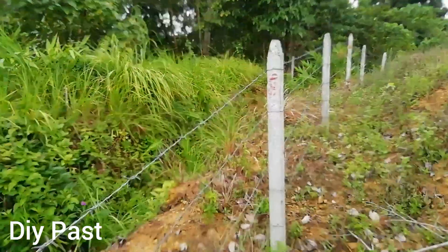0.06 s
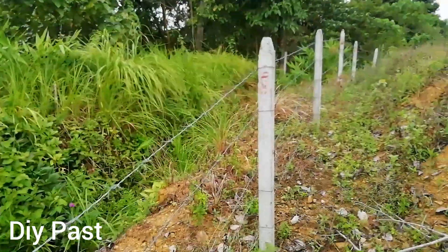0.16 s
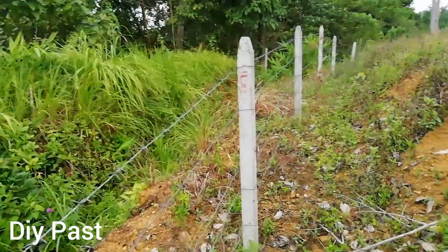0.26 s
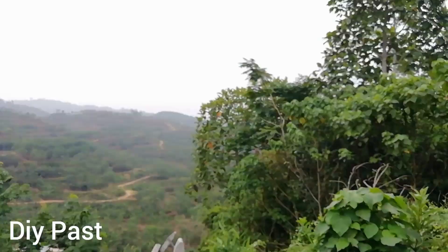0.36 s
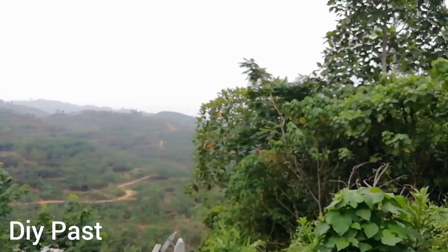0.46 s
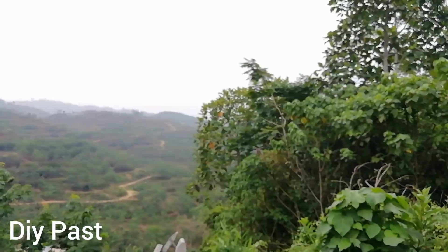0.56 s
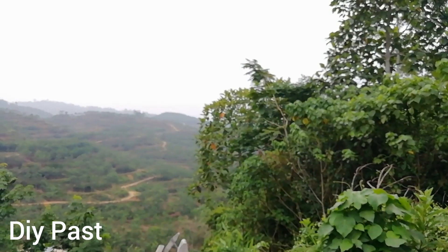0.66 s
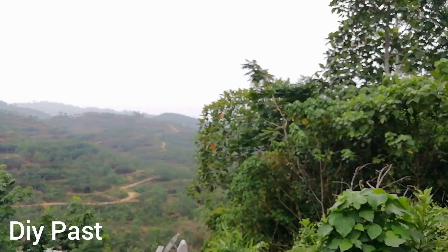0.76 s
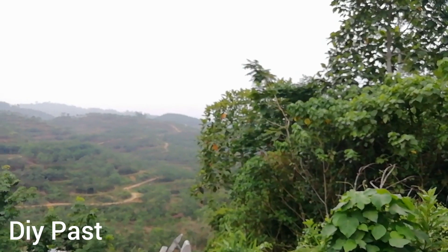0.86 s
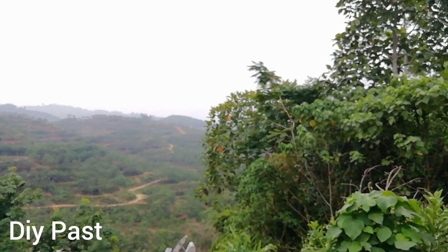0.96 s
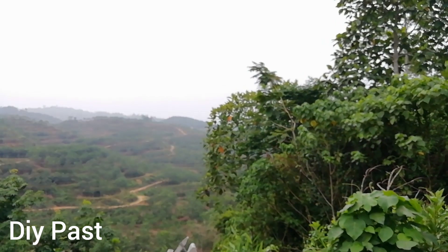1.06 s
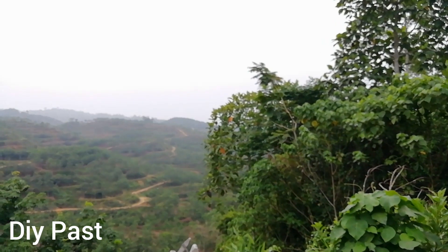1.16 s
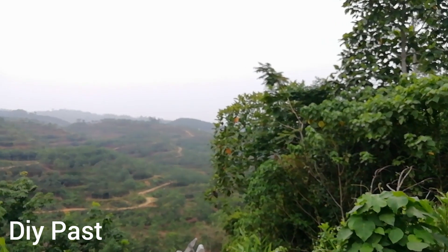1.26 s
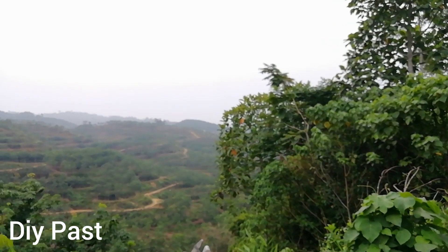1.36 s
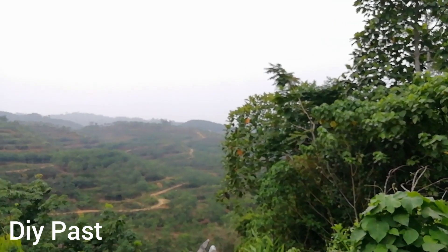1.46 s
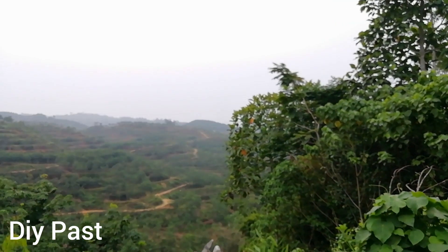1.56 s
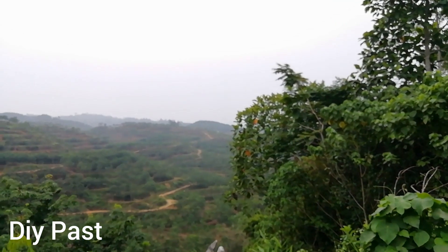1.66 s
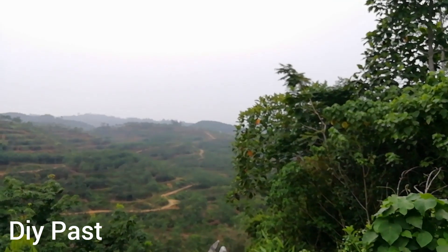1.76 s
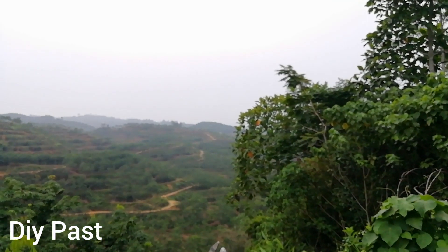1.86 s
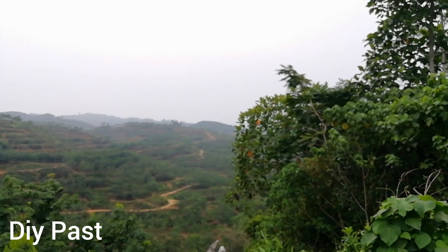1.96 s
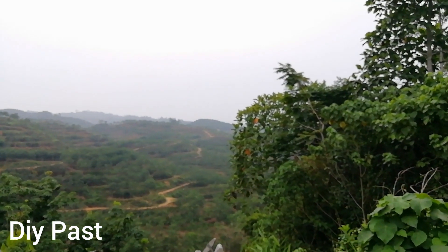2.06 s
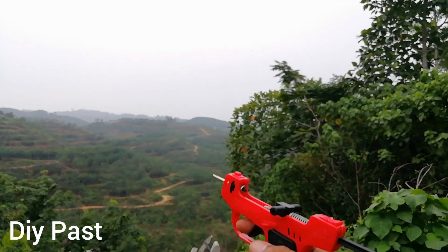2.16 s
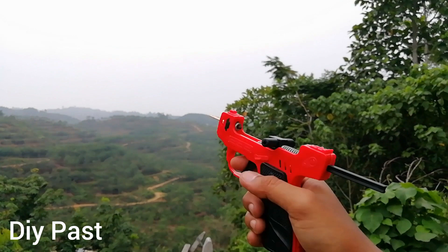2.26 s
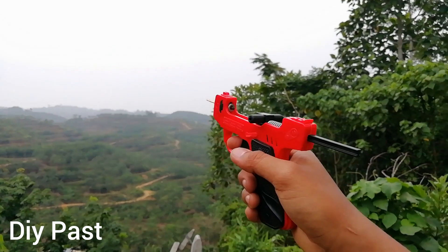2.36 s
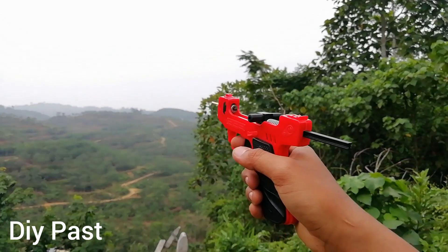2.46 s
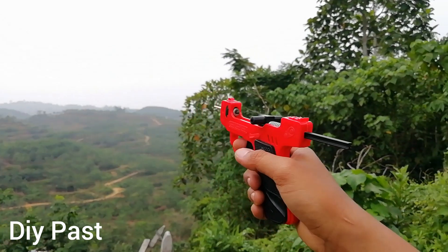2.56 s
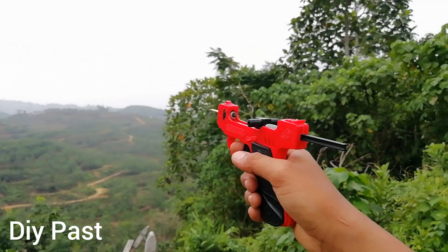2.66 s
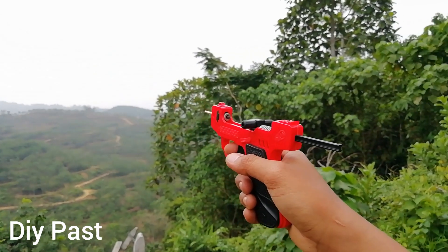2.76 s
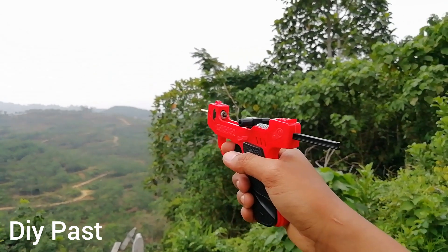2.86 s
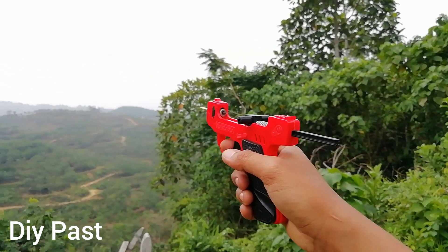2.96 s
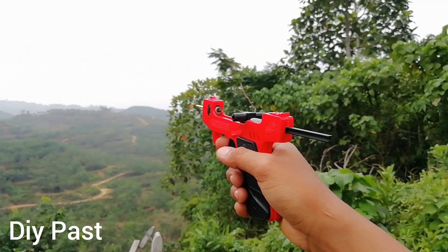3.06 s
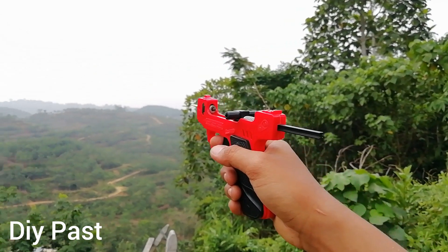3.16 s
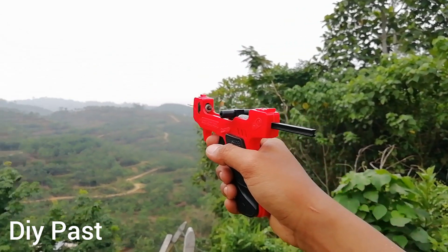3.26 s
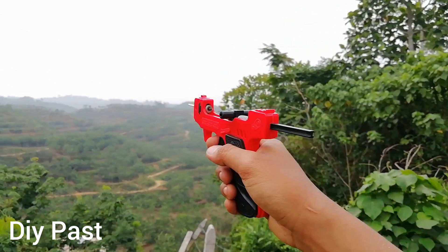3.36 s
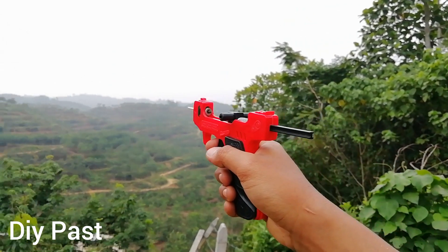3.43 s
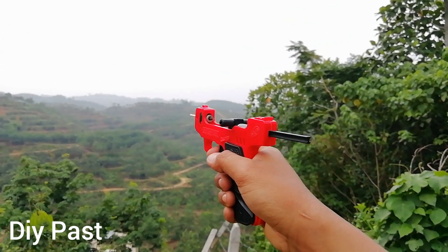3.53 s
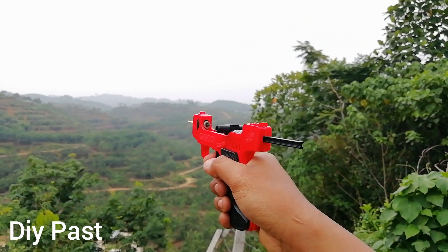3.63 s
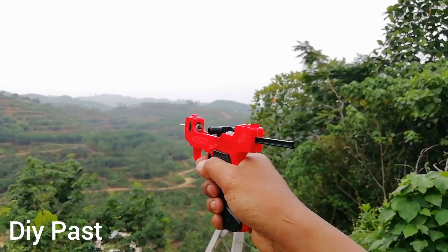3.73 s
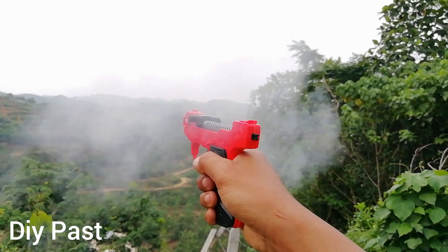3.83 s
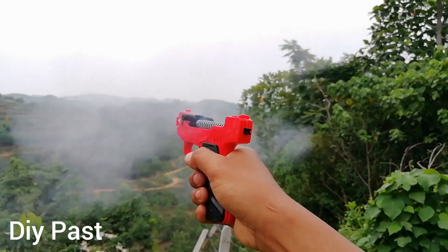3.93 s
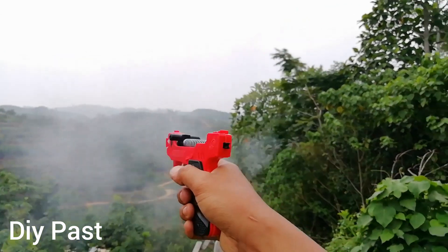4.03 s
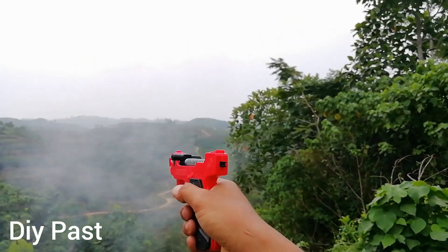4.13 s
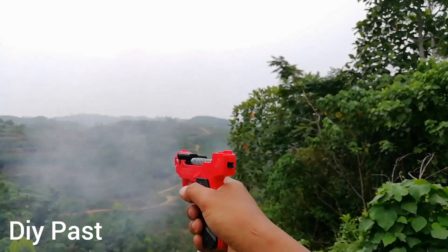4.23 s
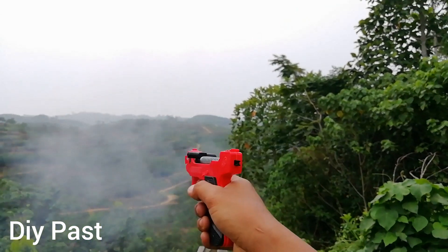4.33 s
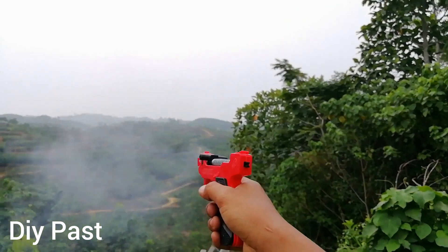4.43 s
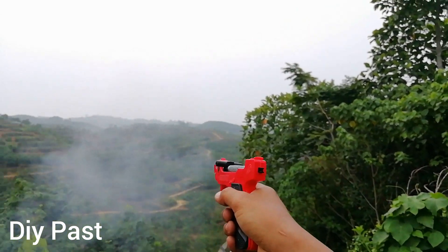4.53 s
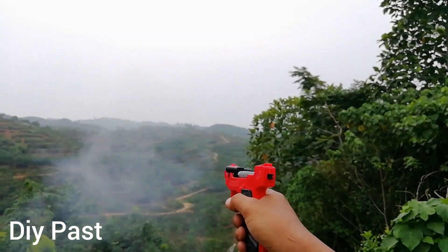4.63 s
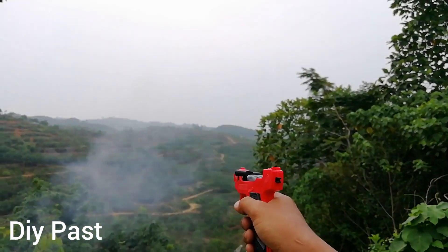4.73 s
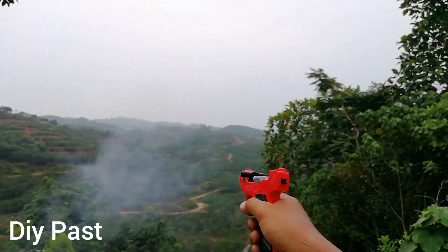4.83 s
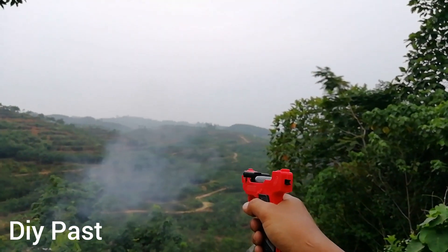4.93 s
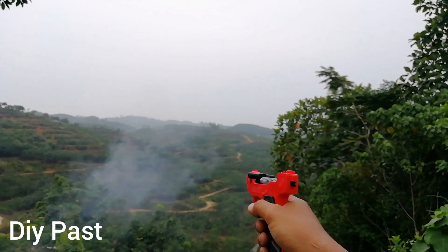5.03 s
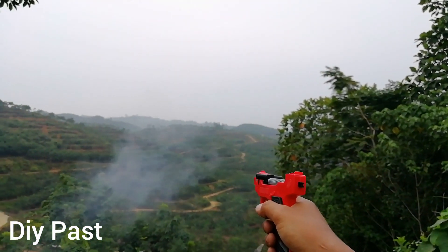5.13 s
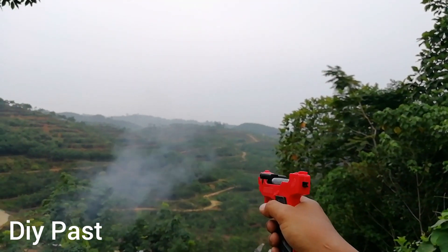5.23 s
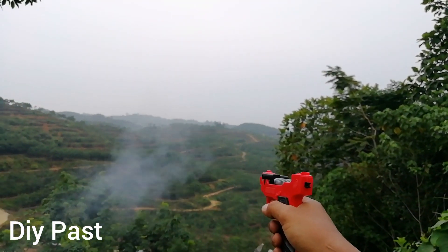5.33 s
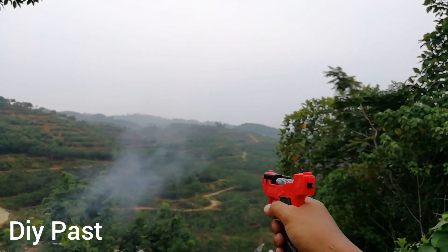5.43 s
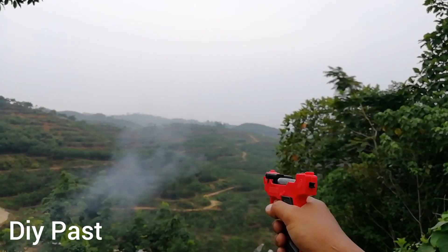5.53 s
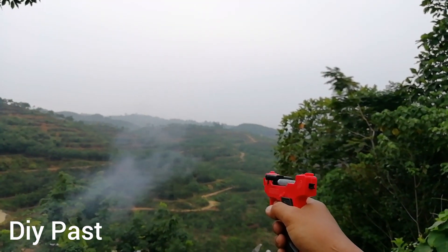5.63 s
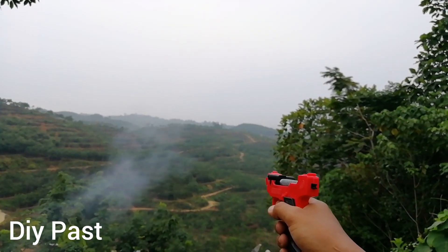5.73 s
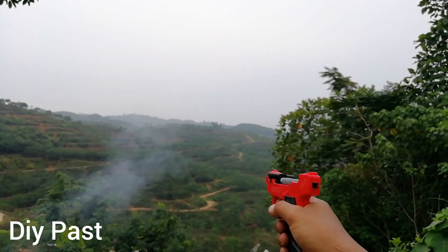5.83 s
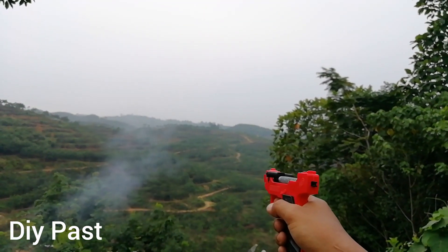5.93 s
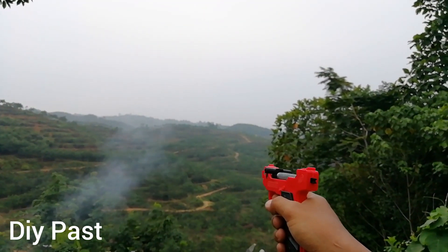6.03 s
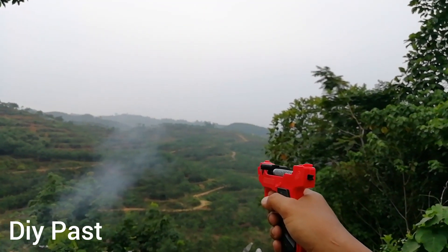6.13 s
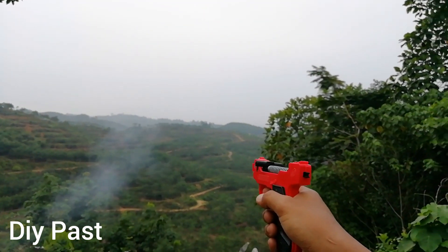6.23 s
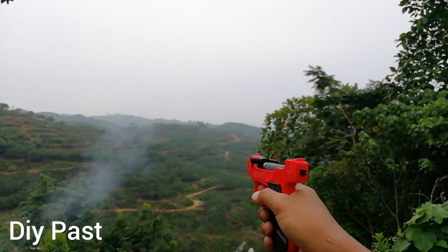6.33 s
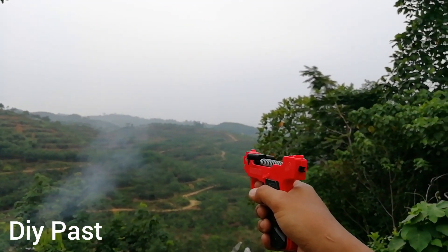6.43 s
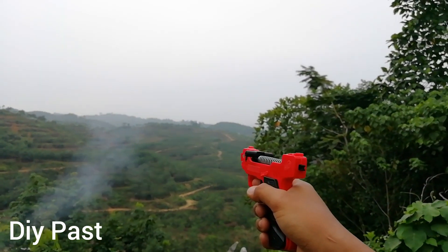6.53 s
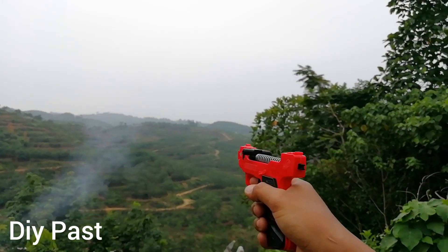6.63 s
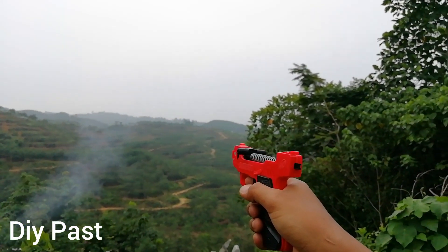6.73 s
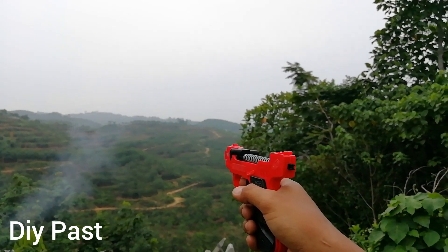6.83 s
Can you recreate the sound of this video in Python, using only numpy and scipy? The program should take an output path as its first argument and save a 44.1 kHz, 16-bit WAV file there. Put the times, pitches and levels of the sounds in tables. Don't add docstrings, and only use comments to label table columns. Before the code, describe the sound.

Crackly grass rustling stops abruptly and gives way to soft open air, thin insect buzzing, regular bird chips and a wavering far whistle. A single dry, ragged toy gun bang overloads the close stereo phone microphone. Foliage scatters it immediately, far slopes answer late with a faint hollow hum, and the tail drops away after about a second and a half. Faint chips, wind thumps and plastic ticks remain.

```python
import sys
import numpy as np
from scipy import signal
from scipy.fft import rfft, irfft, next_fast_len
from scipy.io import wavfile
from scipy.ndimage import uniform_filter1d

SR = 44100
rng = np.random.default_rng(int(sys.argv[2]) if len(sys.argv) > 2 else 0)


def elevation(decibels):
    levels = np.asarray(decibels, float)
    return 10 ** (levels / 20)


def digitize_waveform(pressure):
    field = np.atleast_2d(pressure).T
    bounded = np.clip(field, -1, 1)
    quanta = np.round(bounded * 32767).astype(np.int16)
    wavfile.write(sys.argv[1], SR, quanta)


N = 303849
CUT_S = 0.387
VALLEY_END_S, VALLEY_FADE_S = 5.53, 0.06


def read(points, hz):
    f, value = np.transpose(points)
    return np.interp(np.log(hz + 1), np.log(f + 1), value)


def evened(x):
    return x / np.sqrt(np.mean(x ** 2) + 1e-20)


def add(mix, start_s, sound):
    part = mix[..., round(start_s * SR):][..., :sound.shape[-1]]
    part += sound[..., :part.shape[-1]]


def coloured(points, shape):
    size = next_fast_len(shape[-1])
    z = rfft(rng.standard_normal(shape), size)
    gain = elevation(read(points, np.fft.rfftfreq(size, 1 / SR)))
    return evened(irfft(z * gain, size)[..., :shape[-1]])


def resonate(x, hz, width_hz):
    r = np.exp(-np.pi * width_hz / SR)
    return signal.lfilter([2 * (1 - r)], [1, -r * np.exp(2j * np.pi * hz / SR)], x).real


def resonate_twice(x, hz, width_hz):
    return resonate(resonate(x, hz, width_hz), hz, width_hz)


def wander(per_s, shape):
    size = int(SR / per_s)
    return evened(uniform_filter1d(uniform_filter1d(rng.standard_normal(shape), size), size))


def bell(t, middle_s, width_s):
    return np.exp(-((t - middle_s) / width_s) ** 2)


def struck(t, start_s, level_db, fall_db_per_s, rise_s):
    lag = np.maximum(t - start_s, 0)
    return (elevation(level_db - fall_db_per_s * lag) * (1 - np.exp(-lag / rise_s))) ** 2


def patchy(x, depth_db):
    z = signal.stft(x, nperseg=256, noverlap=192)[2]
    patches = uniform_filter1d(rng.standard_normal(z.shape), size=4, axis=1)
    patches = uniform_filter1d(patches, size=16, axis=2)
    z = z * elevation(depth_db * evened(patches))
    return evened(signal.istft(z, nperseg=256, noverlap=192)[1][:, :N])


def valley_open(t):
    return (1 - np.tanh((t - VALLEY_END_S) / VALLEY_FADE_S)) / 2


# start_s, level_db, fall_db_per_s
BRUSHES = [(0, -60, 900), (.005, -60.5, 58), (0.026, -53, 900), (0.0535, -40.5, 1100), (0.072, -47, 250),
           (.081, -56.5, 200), (0.0876, -38, 800), (0.11, -73, 195), (0.176, -45.5, 340), (.2, -59.5, 127),
           (.12, -59, 67), (.255, -69, 155)]
# pitch_hz, density_db_per_hz
RUSTLE_COLOUR = [(150, 0.5), (250, -3), (366, 1.5), (413, -12.5), (759, -15), (1300, -10), (1840, -11.5),
                 (2080, -13), (5300, -14), (14700, -31.5), (15800, -19)]
# start_s, level_db, fall_db_per_s
SEED_HEADS = [
    (.026, -52, 2000),
    (.0975, -44, 2200),
    (.11, -63, 30),
    (.178, -50, 150),
    (.195, -59.5, 45),
]
# pitch_hz, density_db_per_hz
SEED_COLOUR = [(5000, -25), (9000, 1), (13000, 0), (15800, -2)]
BRUSH_RISE_S, SEED_END_S = 0.0017, 0.296
STALK_HZ, STALK_WIDTH_HZ, STALK_DB = 3070, 720, -14.5


def grass():
    size = round(CUT_S * SR)
    t, out = np.arange(size) / SR, np.zeros((2, N))
    level = np.sqrt(sum(struck(t, *row, BRUSH_RISE_S) for row in BRUSHES))
    snaps = elevation(3.2 * np.minimum(rng.exponential(1, (2, size // 64 + 1)), 4))
    snaps = snaps.repeat(64, axis=1)[:, :size]
    stalks = evened(resonate_twice(rng.standard_normal((2, size)), STALK_HZ, STALK_WIDTH_HZ))
    rustle = coloured(RUSTLE_COLOUR, (2, size)) + elevation(STALK_DB) * stalks
    add(out, 0, level * elevation(8.0) * evened(uniform_filter1d(snaps, 40) * rustle))
    swish = np.sqrt(sum(struck(t, *row, 0.001) for row in SEED_HEADS))
    swish = swish * np.clip((SEED_END_S - t) / 0.01, 0.25, 1)
    add(out, 0, swish * coloured(SEED_COLOUR, (2, size)))
    return out


# pitch_hz, width_hz, level_db, throb_depth (0-1)
INSECTS = [
    (7810, 95, -62, 0.55),
    (7586, 170, -67.5, .5),
    (7687, 580, -64.5, 0.4),
    (6726, 600, -65.5, 0.1),
    (7183, 940, -70, 0),
    (4830, 190, -80, .2),
]
# pitch_hz, width_hz, level_db
SAW = (11220, 420, -76)
# start_s, end_s
BOUTS = [(0, .65), (.88, 1.35), (1.7, 2.1), (2.42, 2.93), (3.27, 3.7), (4.25, 4.6), (4.9, 5.15),
         (5.6, 5.85), (6.12, 6.45), (6.76, 8.1)]
STROKES_PER_S = 59.7
CHOIR_FENCE_DB, CHOIR_SAG_DB = -8.5, -1.5


def insects():
    t, out = np.arange(N) / SR, 0
    for hz, width_hz, db, depth in INSECTS:
        stroke = np.cos(2 * np.pi * STROKES_PER_S * t + 0.5 * wander(3, N))
        stroke = np.maximum(stroke, 0) ** 1.2
        band = resonate_twice(rng.standard_normal((2, N)), hz, width_hz)
        out = out + elevation(db + 1.2 * wander(6.3, N)) * evened(band * (1 - depth + depth * stroke))
    hz, width_hz, db = SAW
    bouts = sum(np.clip((t - start_s) / 0.15, 0, 1) * (t < end_s) for start_s, end_s in BOUTS)
    swell = 0.35 + uniform_filter1d(bouts, size=800)
    saw = evened(resonate_twice(rng.standard_normal((2, N)), hz, width_hz))
    choir_db = np.where(t < CUT_S, CHOIR_FENCE_DB, CHOIR_SAG_DB * t * SR / N)
    return elevation(choir_db) * out + elevation(db) * swell * saw


# pitch_hz, density_db_per_hz
AIR_COLOUR = [(200, -1), (350, -5.5), (520, -12), (800, -9.5), (1500, -8.5), (3000, -10), (3900, -9),
              (5000, -6), (6000, -16.5), (9200, -22.5), (10000, -13.5), (12500, -19.5), (14500, -18),
              (15800, -19)]
AIR_DB = -64.5
HUSH_DB, HUSH_BACK_S = -1.5, 0.98


def air():
    t = np.arange(N) / SR
    hush_db = HUSH_DB * (t > VALLEY_END_S) * np.exp(-abs(t - VALLEY_END_S) / HUSH_BACK_S)
    level = elevation(AIR_DB + hush_db + 0.5 * wander(9.8, N))
    return level * patchy(coloured(AIR_COLOUR, (2, N)), 1) * elevation(np.array([[0.8], [-0.8]]))


LATE_MS = 0.9
TURN_MS, TURN_S, TURN_WIDTH_S = -2.5, 2.6, 0.45
END_TURN_MS, END_TURN_S, END_TURN_WIDTH_S = -1.6, 7, 0.84


def sided(x):
    n = np.arange(N)
    turn_ms = TURN_MS * bell(n / SR, TURN_S, TURN_WIDTH_S)
    ms = LATE_MS + turn_ms + END_TURN_MS * bell(n / SR, END_TURN_S, END_TURN_WIDTH_S)
    return np.array([x, np.interp(n - ms * SR / 1000, n, x)])


# middle_s, peak_db, pitch_hz
THUDS = [(0.032, -37, 97), (0.091, -27.5, 88), (0.111, -27.5, 62.6), (0.14, -27.5, 73.6), (0.199, -41, 42),
         (0.235, -37, 93), (0.284, -39.5, 49.5), (0.338, -29.5, 82), (0.375, -38, 53), (1.431, -30.5, 83.5),
         (1.493, -31, 93), (1.512, -26.5, 96), (1.557, -44, 61), (2.71, -42.5, 46.5), (2.801, -44, 46),
         (2.884, -42.5, 50), (3.797, -43.5, 48.5), (4.134, -34.5, 51), (4.232, -40, 53.4), (4.272, -49, 54),
         (4.378, -44, 67.5), (5.232, -35.5, 125), (5.249, -26.5, 86.6), (5.294, -41.5, 68),
         (5.317, -38, 58.4), (5.402, -42.5, 68.6), (5.422, -40, 79), (6.294, -45.5, 64.6),
         (6.328, -48.5, 76.5), (6.86, -41, 63.7)]
# middle_s, half_width_s, level_db
GUSTS = [(0, 0.0069, -36.5), (.13, 0.12, -38.5), (1.4, 0.2, -66), (1.49, 0.046, -44), (2.0, 0.21, -61),
         (2.78, 0.31, -56.5), (3.75, 0.43, -66.5), (3.95, 0.085, -51), (4.2, 0.33, -59), (5.4, 0.21, -60.5),
         (5.9, 0.21, -64.5), (6.33, 0.21, -57), (6.871, 0.042, -51)]
# pitch_hz, density_db_per_hz
RUMBLE_COLOUR = [(13, -37.5), (22, 4), (53, -5.5), (93, -12.5), (167, -28), (231, -25), (289, -33),
                 (500, -31), (650, -61), (1100, -120)]
CALM_DB = -72


def thuds():
    out, t = np.zeros(N), np.arange(-1000, 1000) / SR
    for (s, db, hz), turn in zip(THUDS, rng.random(99)):
        swing = np.exp(-(t * hz / 0.5) ** 2) * np.cos(2 * np.pi * (hz * t + turn))
        steep = np.exp(-(t * hz / 0.46) ** 2) * np.cos(2 * np.pi * (2.52 * hz * t + turn))
        add(out, max(s - 1000 / SR, 0), elevation(db) * (swing + elevation(-15) * steep))
    t = np.arange(N) / SR
    level = elevation(CALM_DB) + sum(elevation(db) * bell(t, s, width_s) for s, width_s, db in GUSTS)
    rumble = coloured(RUMBLE_COLOUR, (3, N)) * level * elevation(2.7 * wander(21.0, N))
    return sided(out + rumble[0]) + 0.5 * rumble[1:]


# start_s, peak_db, ring_hz, snap_db, left_minus_right_db
TICKS = [(0.0258, -39, 3050, -3, -8), (.028, -46, 1490, -20, -8), (.054, -28, 3170, -8, -7),
         (.059, -40, 2050, -20, -3), (.1125, -47, 2120, -20, 2), (.153, -49, 1500, -22, -4),
         (0.089, -27, 1810, -29, -7), (.03, -40, 400, -25, -5), (.053, -34, 520, -25, -5),
         (.056, -33, 330, -25, -5), (.092, -28, 300, -25, -5), (.2, -34, 320, -25, -5),
         (.098, -25.5, 5540, -3.5, 19), (0.184, -30.5, 1440, -4, -1), (0.184, -33.5, 4400, -16, -13),
         (0.193, -38, 1280, -18, -9), (.204, -35, 1300, -12, 2), (.213, -41, 1150, -20, -6),
         (0.273, -47, 1280, -17, -9), (.262, -37.5, 1010, -9, -6), (.294, -51, 1180, -10, -8),
         (1.069, -56, 2300, 8, -7), (1.73, -51.5, 3830, 8.5, 3), (4.504, -34, 1490, -18, 1),
         (4.504, -40, 950, -18, 1), (4.503, -42, 1850, -18, 1), (5.027, -53, 3966, 14.5, -6),
         (6.362, -57, 2920, 3, 21), (6.383, -45, 784, -25, -10), (6.382, -52, 412, -15, -4),
         (6.384, -51, 1099, -24, -5), (6.361, -57, 1195, -22, 13), (6.395, -53, 750, -22, -11),
         (6.406, -52, 903, -22, -4), (6.754, -54, 950, -20, 0), (6.837, -53, 710, -20, 12),
         (6.851, -50, 2900, -10, 10), (6.755, -56.5, 1920, -10, 1), (6.837, -43, 2520, -20, 16),
         (6.837, -45, 3000, -20, 16), (6.836, -45, 221, -16, 3), (6.838, -51, 1400, -18, 2)]
RING_T60_S, RING_SLOPE = 0.02, 0.38


def ticks():
    t, out = np.arange(3000) / SR, np.zeros((2, N))
    for s, db, hz, snap_db, pan_db in TICKS:
        t60_s = RING_T60_S * (1000 / hz) ** RING_SLOPE
        noise = rng.standard_normal((2, 3000))
        ring = 0.86 * evened(resonate_twice(noise, hz, 0.32 * hz)) + np.sin(2 * np.pi * hz * t)
        ring = ring * elevation(-60 * t / max(t60_s, 0.004))
        snap = elevation(snap_db + 0.5) * noise[::-1] * elevation(-60 * t / 0.0077)
        level = elevation(db - 4.0 + pan_db * np.array([[0.5], [-0.5]]))
        add(out, s, level * (ring + snap) * (1 - np.exp(-t / 0.000088)))
    return out


WAVER = 0.01


def whistle(rows):
    s, hz, db = np.transpose(rows)
    t = np.arange(s[0], s[-1], 1 / SR)
    pitch_hz = uniform_filter1d(np.interp(t, s, hz), size=len(t) // 12 + 1, mode="nearest")
    pitch_hz = pitch_hz * (1 + WAVER * wander(60, (len(t),)))
    tone = np.sin(2 * np.pi * np.cumsum(pitch_hz) / SR)
    return s[0], elevation(np.interp(t, s, db) + 9.0) * tone * signal.windows.tukey(len(t), 0.12)


def trees(x, fall_s):
    t = np.arange(SR // 2) / SR
    fall = np.exp(-(t / fall_s) ** 2) + 0.14 * np.exp(-(t / (2.2 * fall_s)) ** 2)
    taps = rng.standard_normal((2, len(t))) * (1 - np.exp(-t / 0.015)) * fall
    return signal.fftconvolve(x[None], taps / np.linalg.norm(taps[0]), axes=1)[:, :N]


# time_s, pitch_hz, effort_db
SONG = [
    [(2.385, 3110, -75), (2.42, 3215, -69.5), (2.48, 3420, -64.5), (2.51, 3374, -68), (2.545, 3360, -75),
     (2.57, 3360, -75), (2.595, 3373, -65), (2.612, 3300, -78)],
    [(2.62, 3170, -63), (2.66, 3112, -62.5), (2.72, 3120, -56), (2.76, 3230, -61.5), (2.8, 3394, -57),
     (2.86, 3385, -63), (2.9, 3330, -71)],
    [(2.9, 3330, -71), (2.94, 3110, -62), (2.98, 2846, -56.5), (3.03, 2616, -56.5), (3.07, 2483, -64),
     (3.11, 2320, -67), (3.145, 2110, -77.5), (3.165, 2080, -76)],
    [(3.23, 4290, -59), (3.258, 4180, -65), (3.275, 3790, -63), (3.3, 3656, -64.5), (3.35, 3476, -69),
     (3.4, 3470, -63), (3.45, 3460, -84.5), (3.52, 3490, -86.5), (3.58, 3500, -85.5)],
    [(3.532, 2580, -73.5), (3.58, 2543, -68), (3.615, 2510, -67.5), (3.64, 2800, -67), (3.665, 3050, -62),
     (3.7, 3180, -68.5), (3.74, 3290, -71.5), (3.775, 3270, -65.5), (3.79, 3230, -79.5)],
]
# start_s, level_db
CHIPS = [(0.403, -64.5), (0.875, -63), (1.352, -62), (1.804, -61.5), (2.293, -61.5), (2.766, -60),
         (3.231, -61), (3.692, -63.5), (6.33, -71), (6.797, -65.5)]
# time_s, pitch_hz, effort_db
CHIP = [
    (0, 3550, -10),
    (.008, 3430, -1),
    (.03, 2560, -6),
    (.041, 2540, -28),
    (.05, 2680, -3),
    (.062, 2760, -9),
]
# start_s, start_hz, end_hz, length_s, level_db
PEEPS = [(1.42, 4500, 4180, .025, -68.5), (1.509, 3810, 3900, 0.024, -70), (1.535, 3950, 4550, .03, -77),
         (0.652, 3650, 3900, 0.033, -77), (.49, 3200, 2900, 0.023, -76), (2.107, 4880, 4900, .04, -74),
         (2.133, 3040, 2960, 0.083, -75), (2.57, 3900, 5000, 0.04, -76), (2.918, 4020, 4130, 0.023, -81),
         (2.95, 4050, 4630, 0.03, -71), (3.045, 4000, 4630, 0.025, -76), (5.385, 3420, 3480, 0.025, -68.5),
         (6.501, 3850, 3890, 0.029, -75.5)]


def birds():
    song, chips = np.zeros(N), np.zeros(N)
    for rows in SONG:
        add(song, *whistle(rows))
    for s, db in CHIPS:
        scale = (1, rng.uniform(0.99, 1.02), 1)
        add(chips, *whistle(np.array(CHIP) * scale + (s, 0, db)))
    for s, hz, end_hz, length_s, db in PEEPS:
        add(chips, *whistle([(s, hz, db), (s + length_s, end_hz, db)]))
    song *= elevation(2.5 * wander(60, N))
    whistler = elevation(-5) * song + elevation(0.5) * trees(song, 0.066)
    whistler = whistler * elevation(np.array([[-2.5], [2.5]]))
    return whistler + chips * elevation(np.array([[-4], [-7]])) + elevation(-7) * trees(chips, 0.03)


# start_s, peak_db, ring_hz, t60_s
STRIKES = [
    (3.8358, -25, 14700, .004),
    (3.836, -30, 6000, .004),
    (3.839, -3, 13000, .0012),
    (3.839, -5, 15500, .0012),
    (3.839, -6, 10000, .0012),
    (3.839, -12, 6500, .0012),
]
# start_s, left_db, right_db, burn_s, push_share
FLARES = [
    (3.8354, -40, -39.5, 0.0026, 0.00086),
    (3.8390, -13.5, -20.5, 0.0083, 0.065),
    (3.8427, -2.5, -3, 0.005, 1),
    (3.847, -17.5, -5, 0.0039, -0.51),
    (3.8501, 0, -6.5, 0.0083, 0.8),
    (3.857, -14, -11.5, 0.006, 0.059),
    (3.8611, -8.5, -9, 0.004, -0.2),
    (3.8637, -9.5, -7.5, 0.0081, .4),
    (3.8714, -13.5, -14.5, 0.0038, 0.2),
]
# pitch_hz, density_db_per_hz
FLARE_COLOUR = [(180, -34), (300, -5), (759, -16.5), (1400, -1.5), (2390, -10), (4060, -10.5), (4550, -13),
                (5470, -10.5), (9140, -18.5), (14500, -14), (15800, -19.5)]
# pitch_hz, level_db, t60_s
PUSH = [
    (93, -7, 0.043),
    (184, -14.5, 0.058),
    (417, -18, 0.063),
]


def bang():
    t, out, kicks = np.arange(1500) / SR, np.zeros((2, N)), np.zeros(N)
    for s, db, hz, t60_s in STRIKES:
        crack = elevation(db - 60 * t / t60_s) * np.sin(2 * np.pi * hz * t)
        add(out, s, crack * elevation(np.array([[-1.5], [-30]])))
    for s, left_db, right_db, burn_s, push in FLARES:
        shape = (1 - np.exp(-t / 0.00066)) * np.exp(-(t / burn_s) ** 3)
        level = elevation(np.array([[left_db], [right_db]]))
        add(out, s, level * shape * coloured(FLARE_COLOUR, (2, 1500)))
        kicks[round(s * SR)] += push
    t = np.arange(5000) / SR
    swing = sum(elevation(db - 60 * t / t60_s) * np.sin(2 * np.pi * hz * t) for hz, db, t60_s in PUSH)
    low = signal.oaconvolve(kicks, swing)[:N]
    low = signal.lfilter(*signal.butter(2, 60, "high", fs=SR), low)
    return out + np.array([np.roll(low, 42), low])


BANG_S = 3.866
# pitch_hz, density_db_per_hz
NEAR_COLOUR = [(100, -46), (200, -31), (500, -31), (800, -7), (1700, -2.5), (2400, -4.5), (5000, -7),
               (8000, -12), (11000, -13.5), (15800, -13.5)]
ABSORB_DB_PER_S = 24.5


def thicket():
    out = coloured(NEAR_COLOUR, (2, N))
    first = slice(round(BANG_S * SR), round(BANG_S * SR) + SR)
    hz, lag_s, z = signal.stft(out[:, first], SR, nperseg=256)
    loss_db = ABSORB_DB_PER_S * (hz[:, None] / 10000) ** 2 * lag_s
    out[:, first] = signal.istft(z * elevation(-loss_db), SR, nperseg=256)[1][:, :SR]
    return out


# pitch_hz, density_db_per_hz
FAR_COLOUR = [(100, -33.5), (250, -10.5), (470, -6.5), (1150, -5.5), (1380, -4.5), (1480, -3.5),
              (1590, -3.5), (2100, -9), (2900, -10), (4000, -16.5), (6000, -19.5), (9000, -41)]
# start_s, level_db, fall_db_per_s, low_body_db
SLOPES = [
    (3.9, -41, 24, -3),
    (4.5, -52, 21.5, -10),
    (4.99, -59, 10, -3),
]
# middle_s, half_width_s, level_db
LUMPS = [(3.9, 0.011, -0.5), (3.936, 0.0091, 2), (3.965, .012, -1), (3.997, .005, 0.5), (4.015, .01, 0.5),
         (4.033, .007, 2), (4.058, .005, 0), (4.09, .012, 1.5), (4.14, .012, -1), (4.17, .012, 1),
         (4.275, 0.022, 1), (4.9, 0.058, 1)]
NEAREST_DB, NEAREST_T60_S = -17.5, 0.12
BUSHES_DB, BUSHES_TOP_S, BUSHES_FALL_DB_PER_S2 = -22, 0.053, 269
DULLING_S, BRIGHT_SHARE, SCATTER_DB = 0.52, 0.97, 4
BODY_HZ = 1100
SLOPE_RISE_S, LINGER_DB = 0.014, -74.5


def scatter():
    t = np.arange(N) / SR
    lag_s = np.maximum(t - BANG_S, 0)
    nearest = struck(t, BANG_S, NEAREST_DB, 60 / NEAREST_T60_S, 0.001)
    bushes = nearest + elevation(BUSHES_DB - BUSHES_FALL_DB_PER_S2 * (lag_s - BUSHES_TOP_S) ** 2) ** 2
    answers = [struck(t, s, db, fall, SLOPE_RISE_S) + 1e-20 for s, db, fall, _ in SLOPES]
    body_db = sum(row[3] * power for row, power in zip(SLOPES, answers)) / sum(answers)
    valley = sum(answers) * valley_open(t)
    lumps_db = sum(db * bell(t, s, width_s) for s, width_s, db in LUMPS)
    level = np.sqrt(bushes + valley + elevation(LINGER_DB) ** 2) * (t > BANG_S) * elevation(lumps_db)
    far = np.clip(1 - BRIGHT_SHARE * bell(lag_s, 0, DULLING_S), 0, 1)
    lean = elevation(np.array([[1.5], [-0.5]]))
    dull = coloured(FAR_COLOUR, (2, N))
    low = signal.filtfilt(*signal.butter(2, BODY_HZ, fs=SR), dull)
    dull = dull - (1 - elevation(body_db)) * low
    mix = np.sqrt(1 - far) * thicket() + lean * np.sqrt(far) * dull
    return level * elevation(SCATTER_DB) * patchy(mix, 2.4)


# start_s, level_db, fall_db_per_s
GULLY = [
    (4.47, -65.5, 10),
    (5.03, -64.5, 3),
    (5.55, -78, 10),
]
GULLY_HZ, GULLY_WIDTH_HZ = 1470, 170
# start_s, level_db, fall_db_per_s
CANOPY = (4.0, -44.5, 59)
# pitch_hz, density_db_per_hz
CANOPY_COLOUR = [(3000, -22), (6000, -1), (10000, -3), (15800, -9.5)]


def gully():
    t = np.arange(N) / SR
    first, second, rest = [struck(t, *row, 0.04) for row in GULLY]
    hum = evened(resonate(rng.standard_normal((2, N)), GULLY_HZ, GULLY_WIDTH_HZ))
    hum = resonate(hum * elevation(2.0 * wander(16, N)), GULLY_HZ, 4 * GULLY_WIDTH_HZ)
    hum = hum * np.sqrt((first + second) * valley_open(t) + rest)
    return hum + np.sqrt(struck(t, *CANOPY, 0.055)) * coloured(CANOPY_COLOUR, (2, N))


def scene():
    before = grass() + insects() + air() + thuds() + ticks() + birds()
    return before + bang() + scatter() + gully()


# pitch_hz, left_minus_right_db
PORTS = [(60, 0), (400, -1), (700, -2.5), (1400, 0), (2500, 0), (4400, -2), (6300, -7), (8000, -14),
         (9500, -4), (11000, 1), (14000, 8), (15800, 9)]
# pitch_hz, density_db_per_hz
HISS_COLOUR = [(8800, -30.5), (10500, 2.5), (13000, -2), (15800, 0)]
HISS_DB = -70.5


def overloaded_ports(dry):
    size = next_fast_len(N)
    half_db = read(PORTS, np.fft.rfftfreq(size, 1 / SR)) / 2
    ports = irfft(rfft(dry, size) * elevation(np.array([half_db, -half_db])), size)[:, :N]
    return np.clip(ports + elevation(HISS_DB) * coloured(HISS_COLOUR, (2, N)), -1.1, 1.1)


def gate(x):
    mid_side = np.array([x[0] + x[1], x[0] - x[1]]) / 2
    z = signal.stft(mid_side, nperseg=1024, noverlap=768)[2]
    power = uniform_filter1d(uniform_filter1d(abs(z) ** 2, size=2, axis=1), size=8, axis=2)
    weak = power < np.percentile(power[..., ::4], 9, axis=2, keepdims=True)
    above_insects = power[:, 198:224]
    weak[:, 198:224] = above_insects < np.percentile(above_insects, 25)
    weak[:, :9] = weak[:, 145:195] = False
    keep = uniform_filter1d(np.where(weak, 0.06, 1.0), size=3, axis=2)
    mid, side = signal.istft(z * keep, nperseg=1024, noverlap=768)[1][:, :N]
    return np.array([mid + side, mid - side])


EDGE_HZ = 15800


def band_limit(x):
    size = next_fast_len(N)
    edge = 1 / (1 + (np.fft.rfftfreq(size, 1 / SR) / EDGE_HZ) ** 150)
    return irfft(rfft(x, size) * edge, size)[:, :N]


def roll_off(x):
    return signal.sosfilt(signal.butter(12, 16450, fs=SR, output="sos"), x)


def record(dry):
    mix = band_limit(gate(overloaded_ports(dry)))
    return roll_off(mix)


dry = scene()
out = record(dry)
digitize_waveform(out)
```